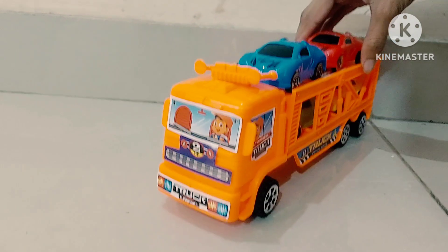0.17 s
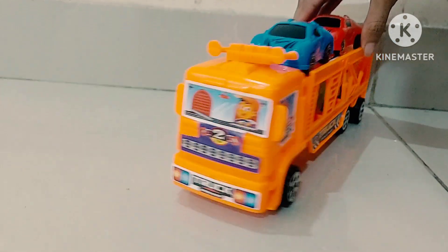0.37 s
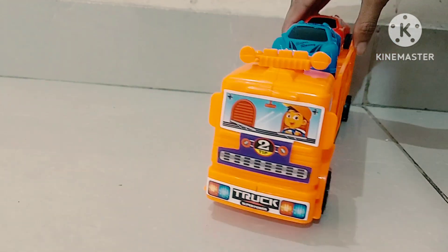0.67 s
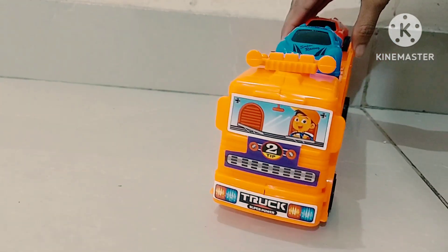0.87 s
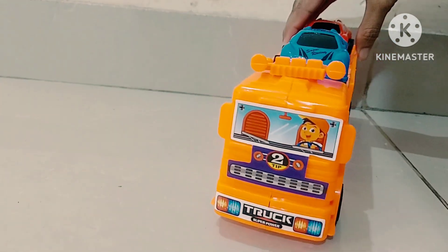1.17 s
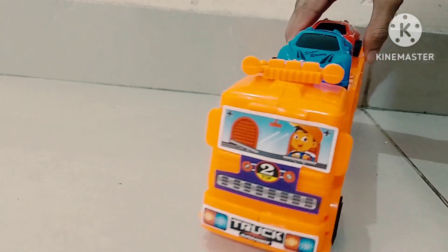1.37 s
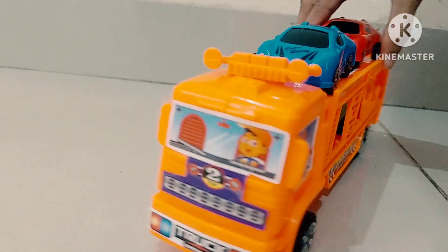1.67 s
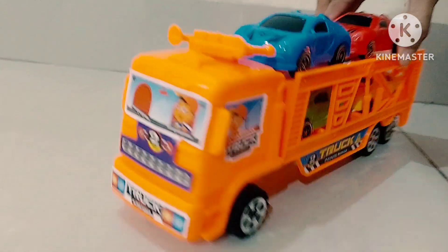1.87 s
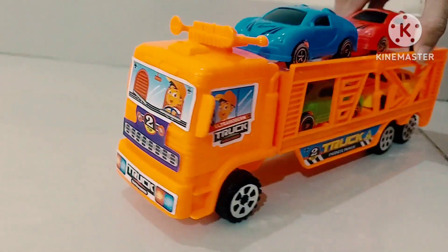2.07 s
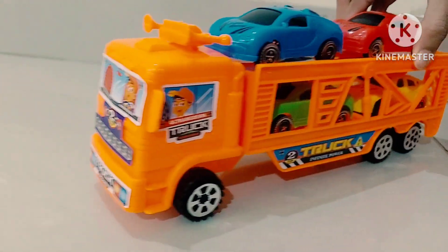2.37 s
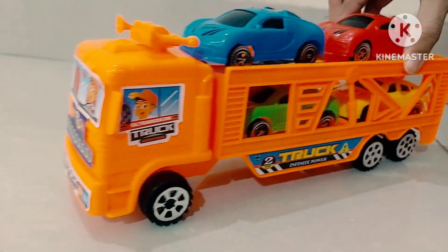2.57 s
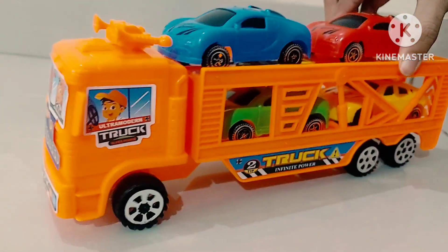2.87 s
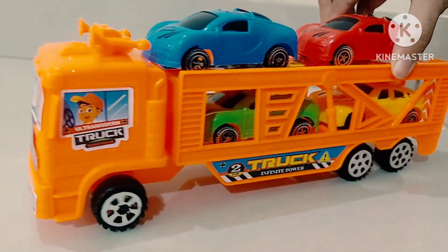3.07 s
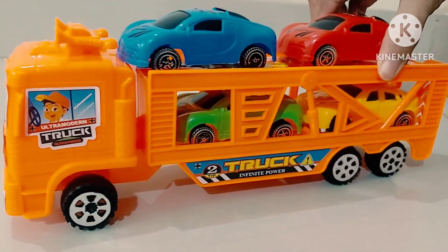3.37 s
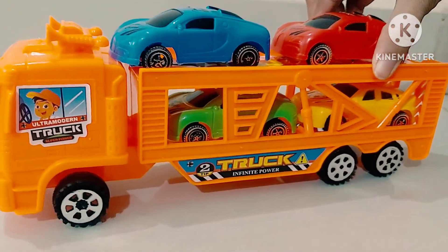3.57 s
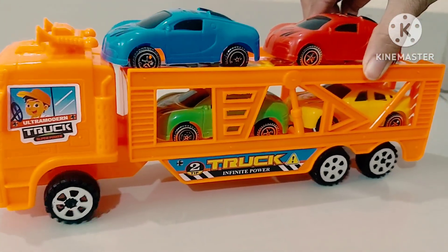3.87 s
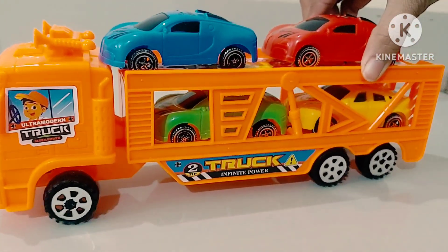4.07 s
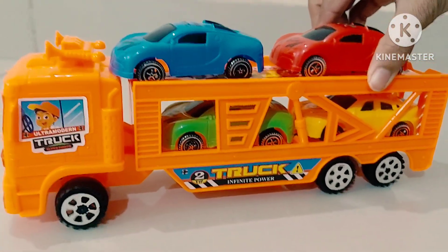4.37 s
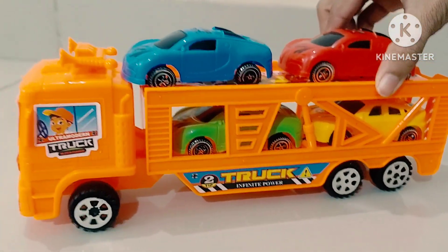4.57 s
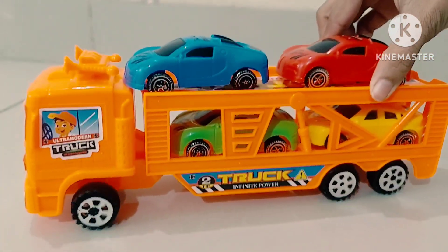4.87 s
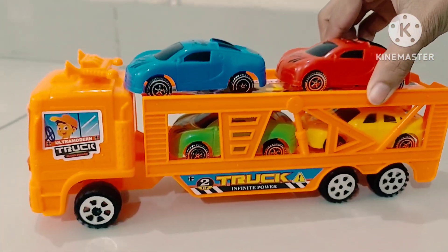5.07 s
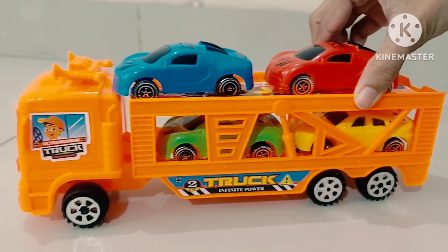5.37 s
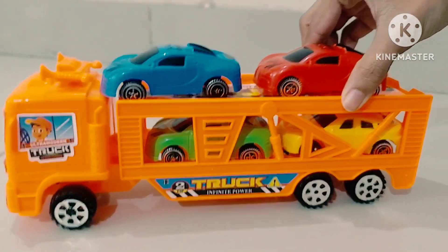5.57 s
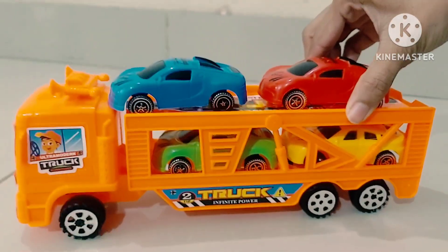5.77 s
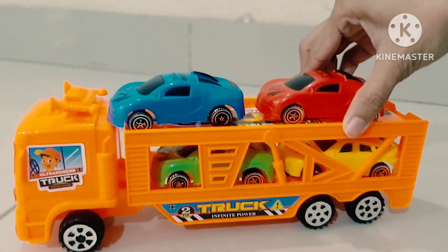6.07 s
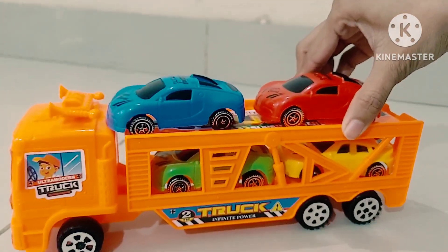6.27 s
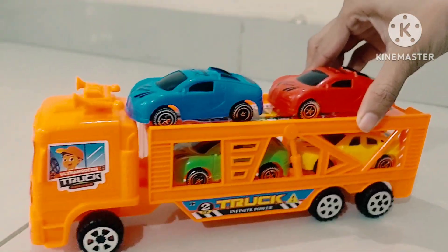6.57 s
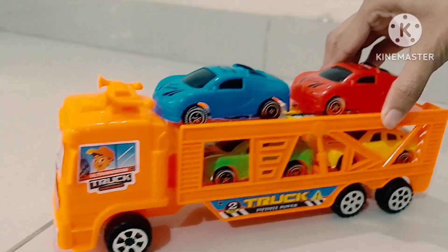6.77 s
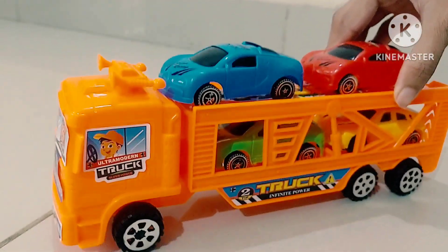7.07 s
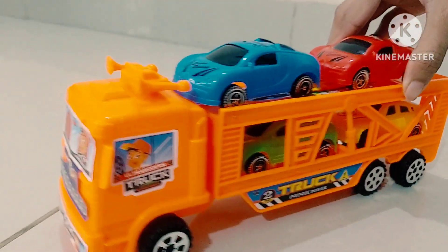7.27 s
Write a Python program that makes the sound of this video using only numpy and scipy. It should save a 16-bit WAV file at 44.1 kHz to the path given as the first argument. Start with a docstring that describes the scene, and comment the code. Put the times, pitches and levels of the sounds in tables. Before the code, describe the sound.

Over a steady low rumble and appliance hum, plastic toy truck wheels roll softly on tile, heard from nearby. They keep catching and slipping in brief, crunchy scrapes, with squeaky axles and tiny high squeals between them. Loose toy cars tick and chatter on the trailer, and soft bumps sound in the hollow body. A last burst of scraping and a sharp click come near the end. The hard room adds a brief echo.

```python
"""Gritty scrapes, clicks and squeaks over soft rolling: a hollow plastic toy truck steered by hand on tile. Its
wheels drum and hiss as they roll, catch and slip in sideways skids, squeal, and creak on their axles. The load
of small cars clicks, the hand rubs as it shifts its grip, bumps ring the body, and pushes thud through the
floor. The hard room answers, over a deep rumble and the hum of an appliance."""
import sys
import numpy as np
from scipy import signal
from scipy.fft import rfft, irfft, next_fast_len
from scipy.io import wavfile
from scipy.ndimage import uniform_filter1d, map_coordinates

SR = 44100
rng = np.random.default_rng(int(sys.argv[2]) if len(sys.argv) > 2 else 0)


def wrap_up_sound(samples):
    """Save the sound to the file named by the first command line argument, as 16-bit audio."""
    columns = np.atleast_2d(samples).T
    # keep every value between -1 and 1, then stretch to whole-number steps
    tamed = np.clip(columns, -1, 1)
    steps = np.round(tamed * 32767).astype(np.int16)
    wavfile.write(sys.argv[1], SR, steps)


N = 327663
TOP_HZ = 11000


def amp(db):
    """Decibels to gain."""
    return 10 ** (np.asarray(db) / 20)


def along(points, hz):
    """Interpolate (f/Hz, value) points on a log frequency axis."""
    f, v = np.transpose(points)
    return np.interp(np.log(hz + 1), np.log(f + 1), v)


def curves(rows):
    """One value per sample for each column after t/s."""
    times_s, *columns = np.transpose(rows)
    return [np.interp(np.arange(N) / SR, times_s, column) for column in columns]


def wobble(rate_hz, count=N):
    """Smooth random curve with rate_hz knots a second."""
    knots = rng.standard_normal(int(N * rate_hz / SR) + 4)
    return map_coordinates(knots, [np.arange(count) * rate_hz / SR])


def filtered(x, response):
    """Apply the gain response(hz) by FFT."""
    count = x.shape[-1]
    padded = next_fast_len(count + 8192)
    return irfft(rfft(x, padded) * response(np.fft.rfftfreq(padded, 1 / SR)), padded)[..., :count]


def add(track, start_s, sound):
    """Mix a sound into a track."""
    part = track[..., round(start_s * SR):][..., :sound.shape[-1]]
    part += sound[..., :part.shape[-1]]


def spread(pair, spectrum):
    """Colour two unrelated signals as mid and side of a stereo sound; mid rms 1."""
    # stereo width: f/Hz, side over mid/dB
    width = [(30, -13), (80, -5.5), (200, -6.5), (1000, -7.5), (3000, -6.5), (6000, -2.5), (8500, 2),
             (10500, -4)]
    mid = filtered(pair[0], lambda hz: amp(along(spectrum, hz)))
    side = filtered(pair[1], lambda hz: amp(along(spectrum, hz) + along(width, hz)))
    return np.array([mid + side, mid - side]) / np.std(mid)


def grit(slips_per_s, scatter_db):
    """Two channels of tiny slips, random in time and size."""
    slips = rng.random(N) < slips_per_s / SR
    size = amp(scatter_db * np.clip(rng.standard_normal(N), -2, 2))
    return slips * size * rng.standard_normal((2, N))


def shell(pair, patchy_db):
    """The plastic shell adds its resonances; others come and go as the contact points shift."""
    # peaks and dips of the thin shell: f/Hz, width/Hz, gain/dB
    bands = [(1770, 98, -1), (2910, 110, 0), (3460, 220, 0), (5100, 220, 1), (5720, 220, 1.5),
             (6630, 120, 1.5), (8500, 1700, 1.5), (9870, 190, -10)]
    hz, _, spectra = signal.stft(pair, SR, nperseg=512)
    steady_db = sum(db / (1 + (2 * (hz - centre_hz) / width_hz) ** 2) for centre_hz, width_hz, db in bands)
    patches = uniform_filter1d(rng.standard_normal(spectra.shape[1:]), size=3, axis=0)
    patches = uniform_filter1d(patches, size=14, axis=1)
    patches /= np.sqrt(np.mean(patches ** 2))
    gain = amp(steady_db[:, None] + patchy_db * patches)
    return signal.istft(spectra * gain, SR, nperseg=512)[1][:, :N]


def background():
    """An appliance hums steadily under a deep rumble."""
    # rumble envelope: t/s, level/dB
    envelope = [(0, -26), (0.7, -27.5), (1.4, -22.5), (3.5, -25.5), (5.1, -25), (6.4, -27.5), (7.43, -23)]
    # rumble spectrum: f/Hz, level/dB
    spectrum = [(7, -33), (12, -6.5), (16, -11), (24, 1), (30, -4), (38, -11.5), (55, -11), (75, -16.5),
                (100, -24.5), (140, -37.5), (300, -87)]
    hum_hz, hum_db = 48.26, -26.5
    rumble_db, = curves(envelope)
    phase = 2 * np.pi * hum_hz * np.arange(N) / SR + 0.58 * wobble(1.455)
    hum = np.sqrt(2) * amp(hum_db) * np.sin(phase)
    return hum + amp(rumble_db) * spread(rng.standard_normal((2, N)), spectrum)


def rolling():
    """Ribbed wheels drum on the hollow body while their tread hisses on the tile."""
    # rolling envelope: t/s, drum/dB, hiss/dB
    envelope = [(0.0, -40.5, -54), (0.7, -40.5, -52.5), (1.47, -39, -54), (2.05, -41, -52.5),
                (2.38, -41, -53), (2.59, -38, -49.5), (2.94, -39.5, -49), (3.77, -41, -52.5),
                (4.1, -37, -49.5), (4.49, -40, -51.5), (5.77, -39.5, -51.5), (6.5, -41, -54),
                (7.43, -39, -49.5)]
    # wheel drumming: f/Hz, level/dB
    drum_spectrum = [(70, -3.5), (115, 1), (195, 2), (235, -6.5), (295, -2.5), (380, -10), (600, -12),
                     (850, -16.5), (1300, -18.5), (2500, -32), (5000, -48)]
    # tread hiss: f/Hz, level/dB
    hiss_spectrum = [(600, -31), (1200, -3), (2500, 3.5), (3800, 3), (5200, -1.5), (6800, -5), (9000, -10),
                     (10200, -7), (11000, -82)]
    drum_db, hiss_db = curves(envelope)
    bumps_db = wobble(28)
    drum = amp(drum_db + bumps_db) * spread(rng.standard_normal((2, N)), drum_spectrum)
    tread = shell(grit(slips_per_s=14000, scatter_db=0), patchy_db=3.5)
    return drum + amp(hiss_db + 1.06 * bumps_db) * spread(tread, hiss_spectrum)


def skid_envelope(length_s, attack_s, swell_db_per_s, release_db_per_s=348):
    """A skid bites, swells under the push and dies when the wheel rolls free."""
    t = np.arange(int((length_s + .2) * SR)) / SR
    held_s, freed_s = np.minimum(t, length_s), np.maximum(t - length_s, 0)
    level_db = swell_db_per_s * (held_s - length_s / 2) - release_db_per_s * freed_s
    return (1 - np.exp(-t / attack_s)) * amp(level_db)


def skids():
    """Wheels dragged sideways catch and slip: coarse clumps crunch, finer slips rasp and fizz."""
    # sideways skids: t/s, length/s, crunch/dB, rasp/dB, fizz/dB
    events = [(0.006, 0.035, -51, -45.5, -46.5), (0.645, 0.11, -60, -58, -54.5),
              (1.192, 0.048, -48, -44, -42.5), (1.257, 0.1, -41.5, -40, -41.5),
              (1.409, 0.025, -46, -43.5, -44.5), (1.468, 0.015, -45, -40.5, -45),
              (1.544, 0.024, -41.5, -43, -42), (1.628, 0.15, -53, -47.5, -80),
              (1.971, 0.088, -42, -47.5, -53), (2.388, 0.052, -52, -51, -60),
              (2.543, 0.053, -52, -53, -49.5), (2.69, .02, -59, -60, -52), (2.725, 0.031, -55, -41, -41.5),
              (2.799, 0.069, -40, -39.5, -42), (2.885, 0.03, -56, -50, -46),
              (2.927, 0.025, -45, -46, -42.5), (2.998, 0.044, -56, -56, -53),
              (3.062, 0.021, -50, -40, -42.5), (3.293, 0.045, -70, -65, -51),
              (4.01, 0.079, -56.5, -52, -49), (4.221, 0.045, -40.5, -44, -41.5),
              (4.301, 0.083, -37.5, -41, -41), (4.435, 0.031, -40.5, -45, -41.5),
              (4.569, 0.028, -46, -41, -44.5), (5.57, 0.019, -59, -48, -46),
              (5.749, 0.033, -37.5, -41, -38.5), (5.806, 0.094, -41.5, -40.5, -41),
              (5.955, 0.024, -54, -42, -45.5), (6.063, 0.012, -46, -39.5, -41),
              (6.09, 0.018, -42, -39, -42), (6.555, 0.022, -55, -48, -56), (7.085, 0.023, -62, -46.5, -44),
              (7.261, 0.039, -35.5, -44.5, -39.5), (7.347, 0.09, -39, -43.5, -43)]
    # crunch in the trailer: f/Hz, level/dB
    crunch_spectrum = [(500, -22.5), (1200, -15), (1500, -6), (1780, 6), (2050, 1), (2350, -2),
                       (2800, -3.5), (4000, -37)]
    # rasp of the biting wheel: f/Hz, level/dB
    rasp_spectrum = [(500, -6), (1100, -11), (1600, -3), (2300, -4), (2900, 1), (3400, -1.5), (3900, 1),
                     (4700, -19), (6500, -39)]
    # fizz of fine slips: f/Hz, level/dB
    fizz_spectrum = [(2500, -19), (4200, -1), (5700, 2), (6300, -0.5), (6800, -2), (7300, -4.5),
                     (8300, 0.5), (9200, -10), (9800, 1.5), (10700, -19)]
    crunch_power, rasp_power, fizz_power = np.zeros((3, N))
    for start_s, length_s, crunch_db, rasp_db, fizz_db in events:
        crunch = amp(crunch_db) * skid_envelope(length_s, attack_s=.018, swell_db_per_s=6)
        rasp = amp(rasp_db) * skid_envelope(length_s, attack_s=.015, swell_db_per_s=6)
        fizz = amp(fizz_db) * skid_envelope(length_s, attack_s=.0081, swell_db_per_s=29)
        add(crunch_power, start_s, crunch ** 2)
        add(rasp_power, start_s, rasp ** 2)
        add(fizz_power, start_s, fizz ** 2)
    clumps = amp(1.7 * wobble(170))
    coarse = shell(grit(slips_per_s=1800, scatter_db=1) * clumps, patchy_db=3.2)
    fine = shell(grit(slips_per_s=13000, scatter_db=1) * clumps, patchy_db=3)
    return (np.sqrt(crunch_power) * spread(coarse, crunch_spectrum)
            + np.sqrt(rasp_power) * spread(fine, rasp_spectrum)
            + np.sqrt(fizz_power) * spread(fine, fizz_spectrum))


def clicks():
    """A snap of contact sets thin plastic chattering; small parts sound higher than large ones."""
    # loose parts tapping: t/s, level/dB, corner/Hz, treble slope/(dB/octave), snap over chatter/dB
    taps = [(0.0981, -38, 1930, -8.5, -8), (0.1328, -39, 2820, -13.5, 9), (0.841, -48, 1800, -13, -6),
            (0.9433, -43.5, 1700, -8.5, -7), (1.485, -41, 3200, -10, -10), (1.5565, -40, 2620, -8, -1),
            (2.035, -33.5, 2400, -10, -4), (2.134, -39, 1760, -8, -8), (2.5551, -34, 2300, -6.5, 6.5),
            (3.0768, -42, 3600, -7, -9), (3.169, -40.5, 2300, -10, -5), (3.454, -44, 2600, -7, -5),
            (3.66, -47, 2200, -15, -6), (4.0346, -45, 3180, -9, 0), (4.5767, -50, 3040, -12, 20),
            (4.6892, -37, 2900, -20, 4), (4.8554, -43, 1780, -15, -3), (4.908, -33.5, 3200, -9.5, -9),
            (5.01, -43, 2200, -8, -6), (5.371, -44, 6000, -20, -6), (5.5134, -43, 4000, -8, -2),
            (6.1035, -38, 3500, 1, 12), (6.203, -33, 2340, -13, -1), (6.587, -47, 4000, -7, 0),
            (6.7053, -43, 2410, -9, -3), (6.915, -44, 3000, -12, -6), (7.0266, -42.5, 3500, -8, -6),
            (7.269, -31, 3060, -7, 9)]
    snap_t60_s, chatter_t60_s = .0038, .1
    out, t = np.zeros((2, N)), np.arange(SR // 6) / SR
    chatter = (1 - np.exp(-t / .001)) * amp(-60 * t / chatter_t60_s)
    snap = amp(-60 * t / snap_t60_s)
    for start_s, db, hz, db_per_octave, snap_db in taps:
        spectrum = [(250, -7), (hz / 2, -7), (hz, 0), (TOP_HZ, db_per_octave * np.log2(TOP_HZ / hz))]
        noise = spread(rng.standard_normal((2, len(t))), spectrum)
        add(out, start_s, amp(db) * (chatter + amp(snap_db) * snap) * noise)
    return shell(out, patchy_db=2.5)


def stick_slip(length_s, first_hz, last_hz, octave_db, mean_rasp, rasp_growth):
    """Unsteady friction tone with fluttering partials; rasp makes it stumble and double its period."""
    attack_s, release_s = .016, .01
    t = np.arange(int(length_s * SR)) / SR
    waver = .013 * (1100 / first_hz) ** .3 * wobble(380, len(t))  # high tones hold pitch better
    stumble_rad = .5 * wobble(900, len(t))
    rasp = mean_rasp * np.linspace(1 - rasp_growth, 1 + rasp_growth, len(t))
    hz = np.linspace(first_hz, last_hz, len(t)) * (1 + (1 + rasp) * waver)
    phase = 2 * np.pi * np.cumsum(hz) / SR + rasp * stumble_rad
    tone = np.zeros(len(t))
    for k, db in enumerate([0, octave_db, octave_db - 9, octave_db - 19], 1):
        if k * first_hz < TOP_HZ:
            flutter = amp(2.4 * wobble(170, len(t)))
            shake = 1 + .8 * rasp * wobble(750, len(t))
            half_order = (k > 1) * rasp * amp(-5) * np.sin((k - .5) * phase)
            tone += amp(db) * flutter * shake * (np.sin(k * phase) + half_order)
    grip = np.clip(np.minimum(t / attack_s, (length_s - t) / release_s), 0, 1)
    return np.sqrt(2) * grip * tone


def axle_creaks():
    """Axles stick and slip in gliding, overtone-rich tones that roughen as they go."""
    # creaks: t/s, length/s, first f/Hz, last f/Hz, level/dB, octave over fundamental/dB, rasp/(0-1)
    events = [(0.345, 0.044, 1104, 1193, -44, 5, 0.2), (0.378, 0.033, 1077, 1047, -37.5, -1, 0.25),
              (0.47, 0.081, 1073, 1087, -40, 2, 0.32), (1.686, 0.031, 1210, 1217, -43.5, -8, 0.5),
              (1.912, 0.099, 1147, 1068, -38.5, 0, 0.28), (1.975, 0.039, 998, 926, -47, 6, 0.46),
              (2.037, 0.05, 1064, 1114, -51, 8.5, 0.1), (4.7, 0.044, 1175, 1180, -51, 3, .5),
              (6.215, 0.052, 1170, 1197, -45, -5, 0), (6.372, 0.031, 1085, 1145, -54.5, 7, 0.3),
              (6.43, .032, 1180, 1327, -42, -9, 0.2), (6.543, 0.061, 1095, 1144, -55.5, 6, 0.4)]
    out = np.zeros(N)
    for start_s, length_s, first_hz, last_hz, db, octave_db, rasp in events:
        tone = stick_slip(length_s, first_hz, last_hz, octave_db, rasp, rasp_growth=.2)
        add(out, start_s, amp(db) * tone)
    return out


def wheel_squeals():
    """Wheels squeal on the tile in high, level, nearly pure tones."""
    # squeals: t/s, length/s, f/Hz, level/dB, rasp/(0-1)
    events = [(0.65, 0.058, 6920, -52, 0), (1.018, 0.017, 5750, -37, .05), (1.024, 0.045, 6420, -47, .3),
              (1.066, 0.055, 5870, -47, 0.85), (1.166, 0.042, 6530, -47.5, .05),
              (2.619, 0.14, 5780, -52, .95), (2.985, 0.081, 5840, -56, .95), (3.306, 0.046, 4760, -53, 0),
              (3.541, 0.039, 6900, -42, 0.04), (4.068, 0.059, 4100, -39, 0.3),
              (4.122, 0.049, 4230, -47.5, 0.4), (4.211, 0.036, 6400, -46, .8),
              (5.588, 0.05, 6310, -48, 0.55), (5.719, 0.044, 6400, -52, 0.7), (6.181, 0.037, 6600, -51, .8),
              (7.018, 0.041, 6710, -50, .05), (7.109, 0.051, 6380, -42.5, 0.3)]
    out = np.zeros(N)
    for start_s, length_s, hz, db, rasp in events:
        tone = stick_slip(length_s, hz, hz, octave_db=-9.5, mean_rasp=rasp, rasp_growth=0)
        add(out, start_s, amp(db) * tone)
    return out


def knocks():
    """Soft bumps ring the body's low modes in a new mix each time; a slow press rings in gradually."""
    # bumps on the body: t/s, level/dB, rise/s
    bumps = [(0.903, -37.5, .008), (1.628, -42, 0.0058), (2.604, -30.5, 0.029), (5.272, -36.5, .005),
             (5.454, -38, 0.01), (6.885, -35.5, 0.0028)]
    # hollow body modes: f/Hz, level/dB, t60/s
    modes = [(289.4, 2, 0.069), (358.4, -7, 0.1), (529, -13, 0.053), (667, -6, 0.024), (841, -13, 0.032)]
    out, t = np.zeros(N), np.arange(SR // 4) / SR
    for start_s, db, rise_s in bumps:
        press = np.sin(np.pi / 2 * np.minimum(t / rise_s, 1)) ** 2
        freed_s = np.maximum(t - rise_s, 0)
        ring = np.zeros(len(t))
        for hz, mode_db, t60_s in modes:
            decay = amp(mode_db + 2 * rng.standard_normal() - 60 * freed_s / t60_s)
            ring += decay * np.sin(2 * np.pi * hz * t + hz / 1000 * wobble(220, len(t)))
        add(out, start_s, amp(db) * press * ring)
    return out


def falling_tone(length_s, hz, fall):
    """A tone that swells and fades while its pitch drops by fall * hz."""
    count = int(length_s * SR)
    pitch_hz = hz * (1 + fall * np.linspace(.5, -.5, count))
    return np.hanning(count) * np.sin(2 * np.pi * (rng.random() + np.cumsum(pitch_hz) / SR))


def thuds():
    """Uneven pushes arrive through the floor as short, deep swells."""
    # pushes: centre t/s, length/s, f/Hz, peak/dB
    pushes = [(1.676, 0.063, 98.6, -29), (1.922, 0.111, 70.6, -21), (4.131, 0.133, 118, -31),
              (4.469, 0.122, 70.7, -19.5), (5.002, 0.0696, 77.4, -20), (5.748, 0.054, 110, -27),
              (7.107, 0.18, 27.3, -13)]
    out = np.zeros(N)
    for centre_s, length_s, hz, db in pushes:
        add(out, centre_s - length_s / 2, amp(db) * falling_tone(length_s, hz, fall=.545))
    return out


def rubs():
    """A hand shifts its grip on the body with a dull rustle."""
    # grip shifts: centre t/s, length/s, level/dB
    shifts = [(2.413, 0.1, -42), (2.544, 0.052, -41), (2.635, 0.08, -40), (4.25, 0.18, -42),
              (7.262, 0.17, -42.5)]
    # rustle spectrum: f/Hz, level/dB
    spectrum = [(120, -7), (280, 10.5), (450, 3.5), (700, 3), (1100, -5.5), (2000, -26.5)]
    envelope = np.zeros(N)
    for centre_s, length_s, db in shifts:
        add(envelope, centre_s - length_s / 2, amp(db) * np.hanning(int(length_s * SR)))
    return envelope * spread(grit(slips_per_s=2000, scatter_db=0), spectrum)


def wheel_chirps():
    """A wheel catches for a few milliseconds and lets go with a falling chirp."""
    # wheel catches: centre t/s, peak/dB
    catches = [(4.071, -38), (4.477, -37), (4.690, -45), (4.858, -45), (4.920, -38), (5.011, -49),
               (5.366, -40), (5.626, -41), (5.973, -37), (7.143, -37), (7.242, -40)]
    out, length_s = np.zeros(N), .009
    for centre_s, db in catches:
        add(out, centre_s - length_s / 2, amp(db) * falling_tone(length_s, hz=3117, fall=.2))
    return out


def room(x):
    """Tiles and walls return a short tail, different in each channel."""
    # tiled room decay: f/Hz, t60/s
    decay = [(200, .26), (2000, .22), (6000, .19), (11000, .15)]
    hz, t, spectra = signal.stft(rng.standard_normal((2, SR // 2)), SR, nperseg=256)
    tail = signal.istft(spectra * amp(-60 * t / along(decay, hz)[:, None]), SR, nperseg=256)[1]
    return signal.fftconvolve(np.atleast_2d(x), tail / np.linalg.norm(tail[0]), axes=1)[:, :N]


def scene():
    """The truck, its echo and the background."""
    scrape, tap = skids(), clicks()
    body = knocks() + rubs()
    squeak = axle_creaks() + wheel_squeals() + wheel_chirps()
    echo = amp(-6) * room(scrape + tap + 1.15 * squeak + body / 2)
    return rolling() + scrape + tap + body + squeak + thuds() + echo + background()


def record(dry):
    """Two microphones of slightly different colour, cut off at TOP_HZ."""
    # channel balance: f/Hz, left over right/dB
    balance = [(22, -0.5), (48, 5), (75, 1.5), (190, -0.3), (600, -0.3), (1100, -2.7), (2200, -1.6),
               (5000, -2.6), (10500, -2.3)]
    return filtered(dry, lambda hz: amp(np.outer([.5, -.5], along(balance, hz))) * (hz < TOP_HZ))


dry = scene()
out = record(dry)
wrap_up_sound(out)
```